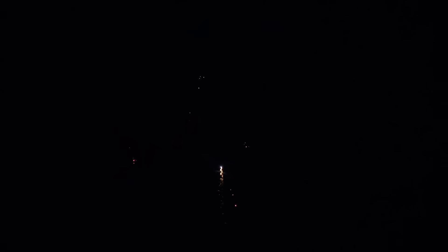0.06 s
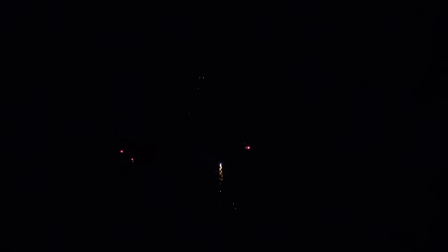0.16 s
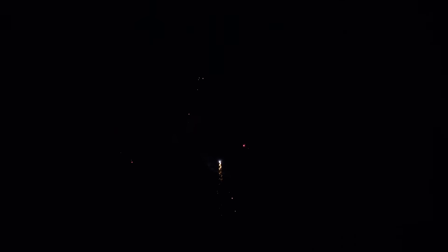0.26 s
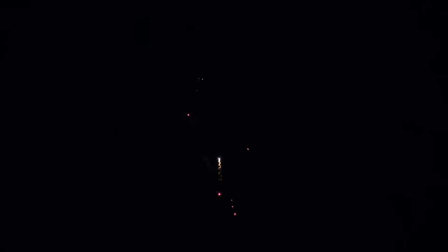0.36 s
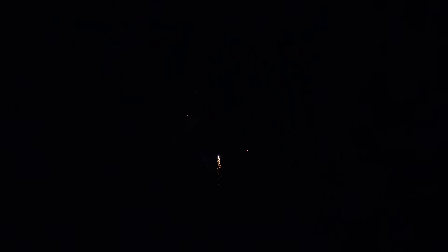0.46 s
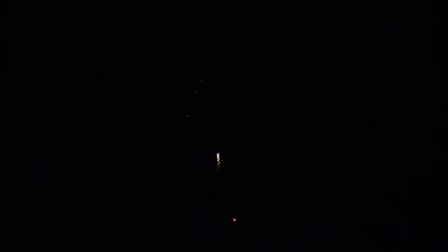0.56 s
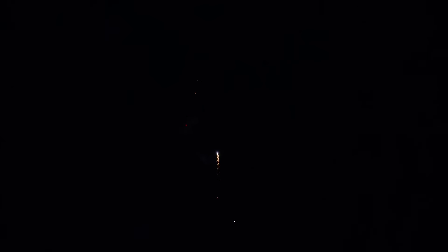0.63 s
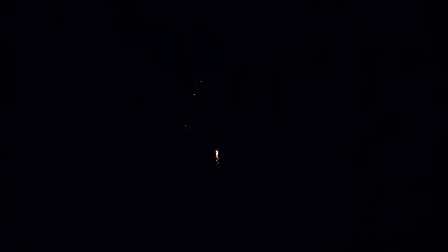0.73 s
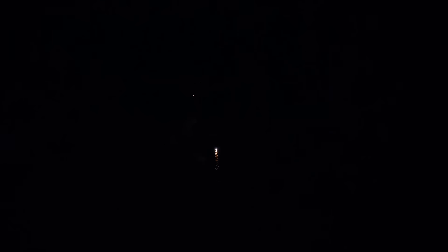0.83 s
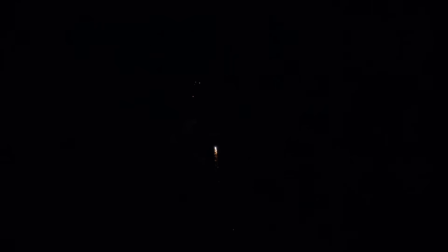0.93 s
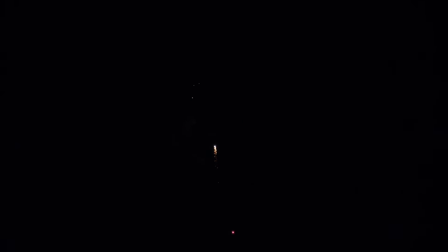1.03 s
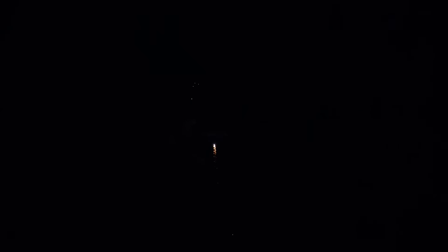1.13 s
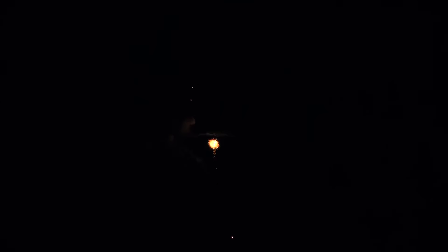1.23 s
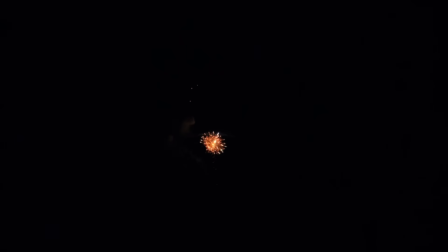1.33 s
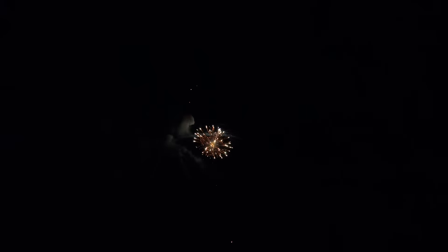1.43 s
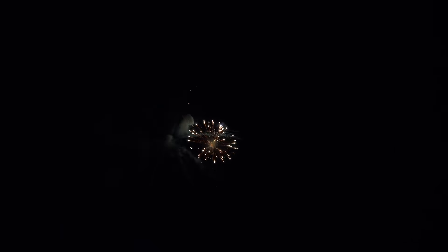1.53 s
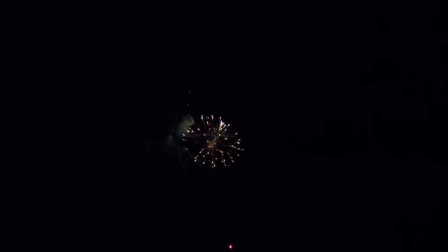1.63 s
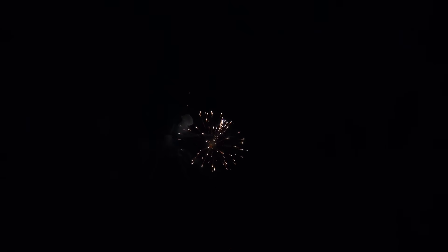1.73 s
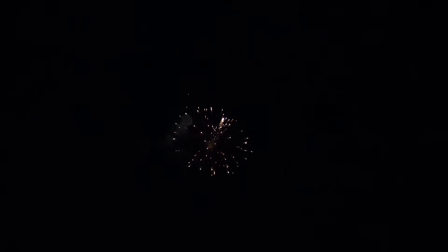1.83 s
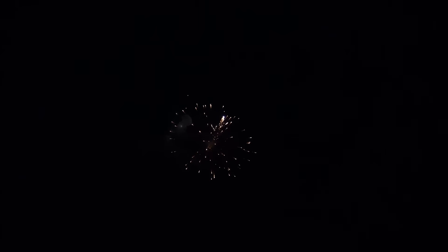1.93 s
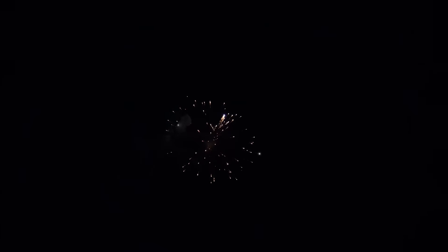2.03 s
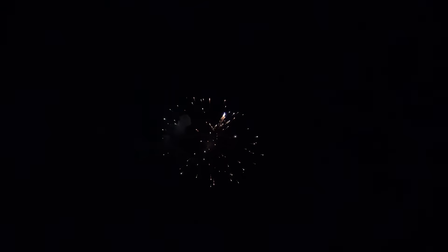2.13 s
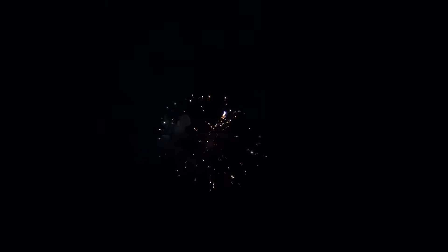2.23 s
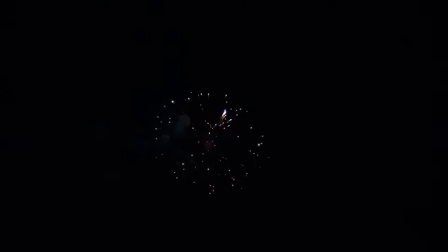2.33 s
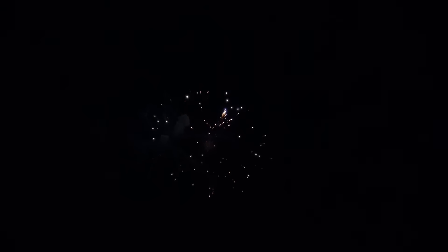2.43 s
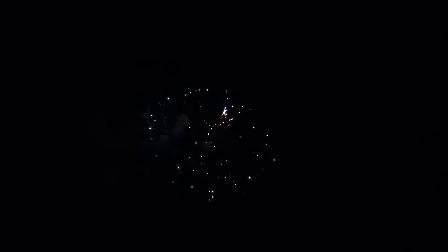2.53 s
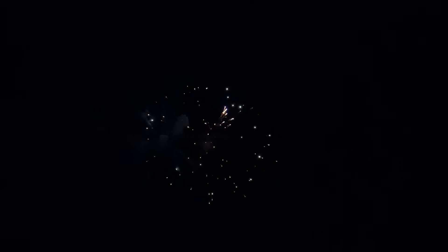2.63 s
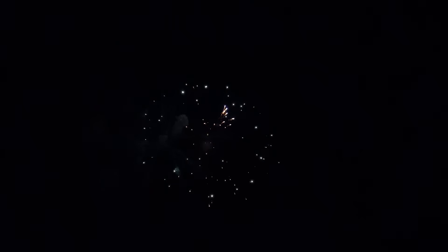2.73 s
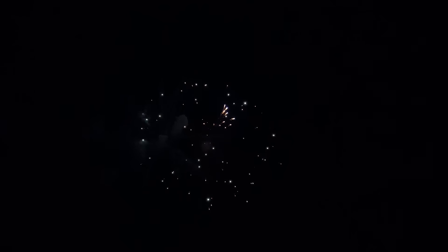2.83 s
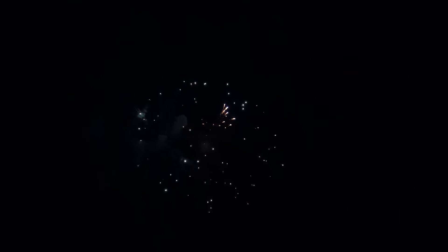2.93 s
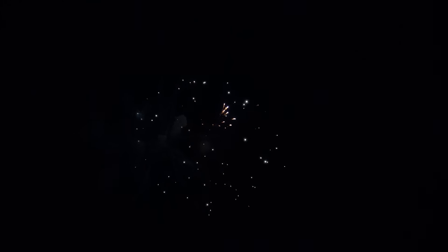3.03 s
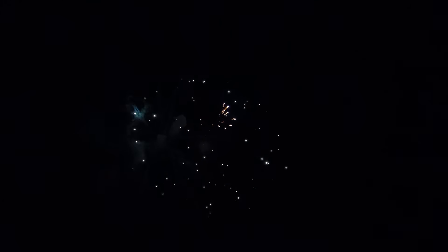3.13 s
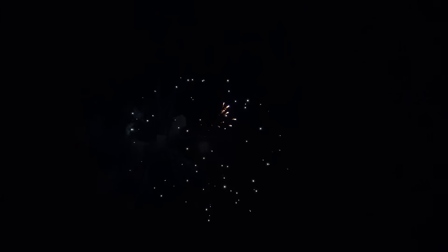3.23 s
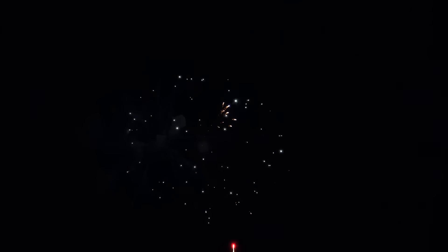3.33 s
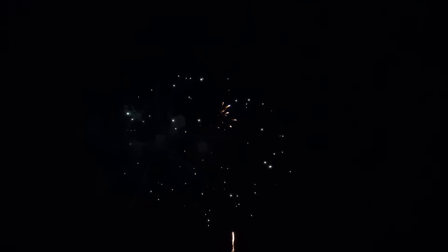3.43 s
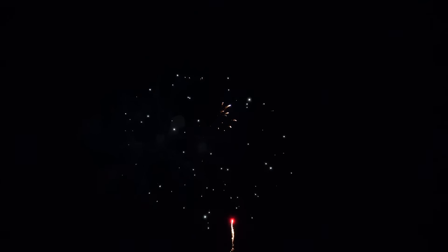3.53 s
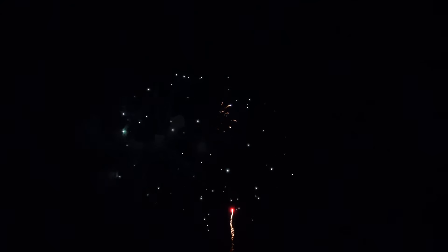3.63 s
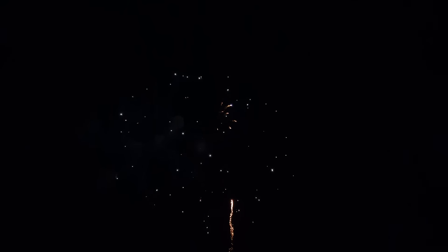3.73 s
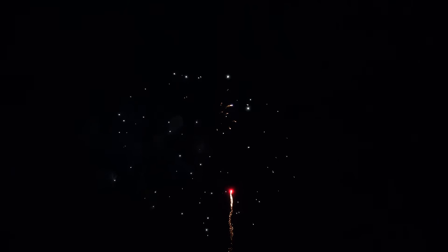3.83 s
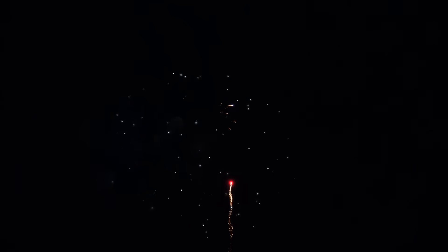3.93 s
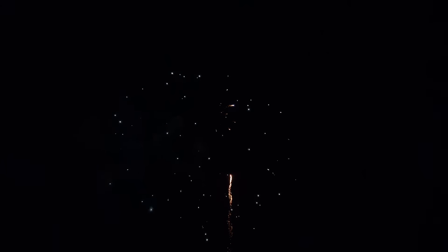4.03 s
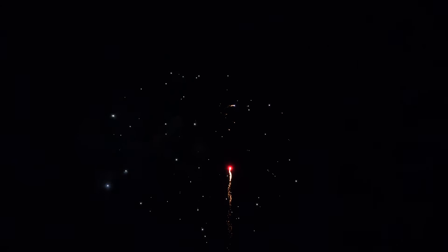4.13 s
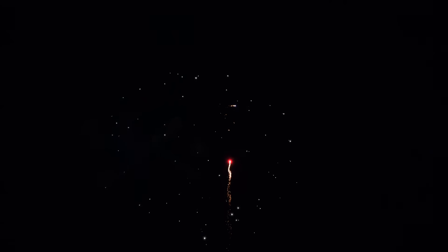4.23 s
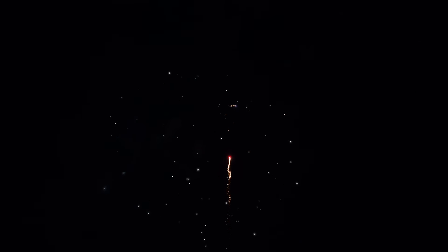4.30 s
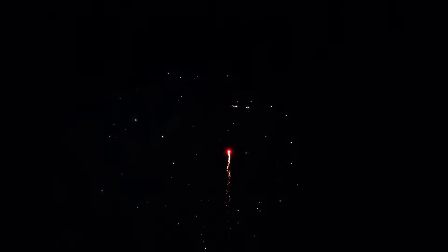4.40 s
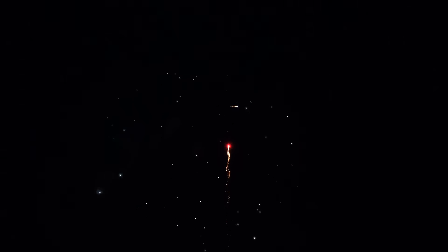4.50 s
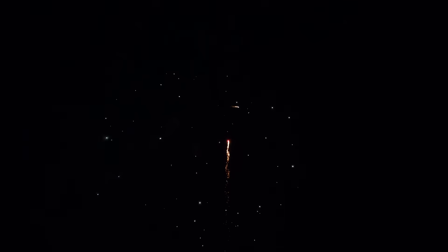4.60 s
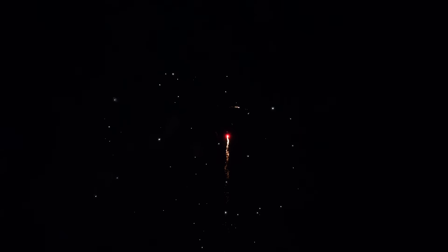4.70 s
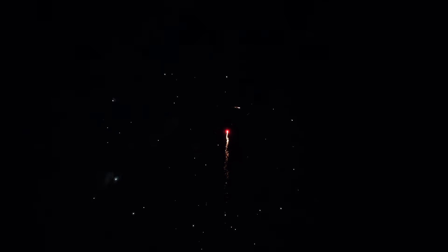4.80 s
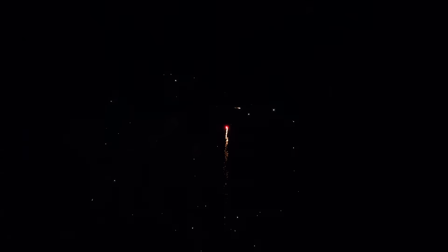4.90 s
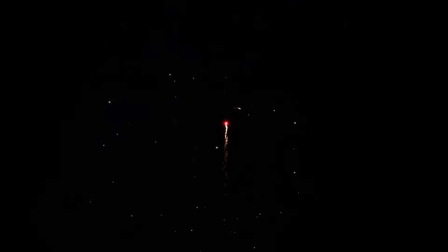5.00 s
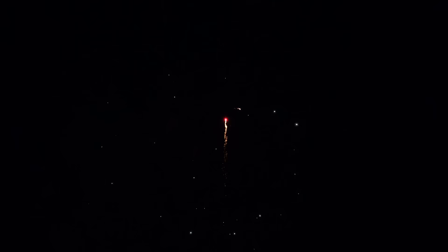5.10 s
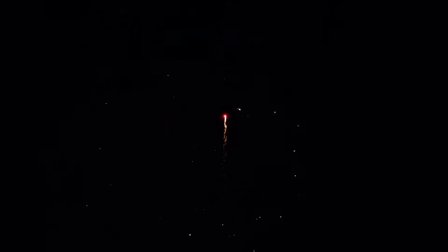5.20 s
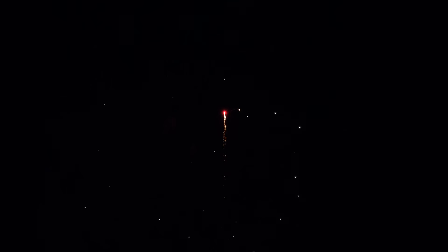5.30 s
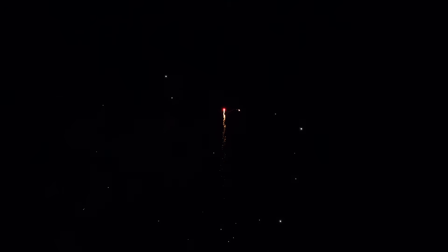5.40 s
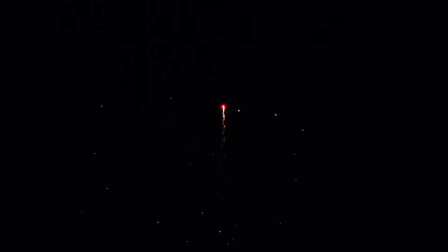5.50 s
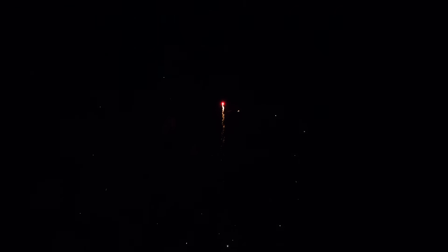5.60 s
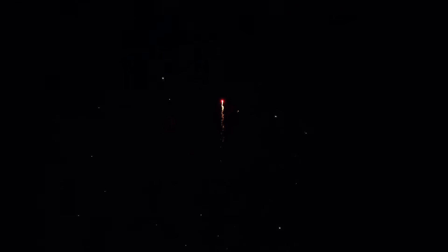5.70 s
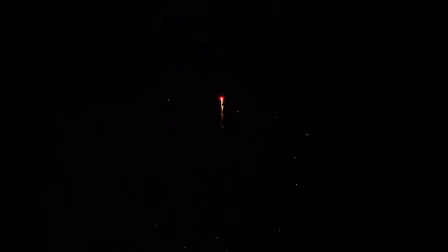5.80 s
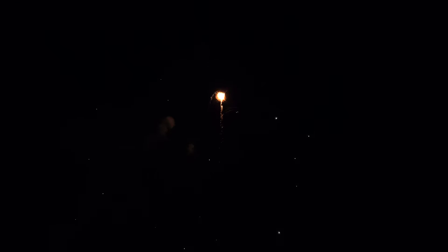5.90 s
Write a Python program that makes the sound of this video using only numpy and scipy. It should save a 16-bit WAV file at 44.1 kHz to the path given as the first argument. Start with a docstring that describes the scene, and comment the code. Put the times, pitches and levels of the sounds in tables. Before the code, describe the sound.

Faint dry ticks and a fading earlier rumble open a quiet open-air night. Far pops on a dull swell lead into a rounded firework thump, followed quickly by a brighter, ragged crack with a short bass boom. Ground and walls throw back clattering knocks, thinning into a long dull roll. Late distant reports and more ticks remain. The stereo pickup is bass-heavy towards the left, and the peaks saturate.

```python
"""Open country at night: low rumble, steady hiss, an earlier shell still rolling, and faint ticks close by.
Far reports then rumble on a dull swell, with thin falling peeps, until a firework shell gives a round thump.
A second shell follows with a tearing rasp, a harder crack and a deep boom; ground and walls return each shock.
The echoes roll away and grow dull; late far reports and more ticks remain.
Bangs are filtered N-waves, booms decaying sines, echoes shaped noise dulled by air, ticks short noise bursts."""
import sys
import numpy as np
from scipy import signal
from scipy.fft import rfft, irfft, next_fast_len
from scipy.io import wavfile
from scipy.ndimage import map_coordinates

SR = 44100
rng = np.random.default_rng(int(sys.argv[2]) if len(sys.argv) > 2 else 0)


def transcribe(u):
    """Save the signal u as a 16-bit wav file named by the first command-line argument.

    u: samples, shape (n,) or (channels, n), limited to [-1, 1]; the rate is SR.
    q: integer samples, one column per channel.
    """
    v = np.clip(np.atleast_2d(u).T, -1, 1)
    q = np.round(v * 32767).astype(np.int16)
    wavfile.write(sys.argv[1], SR, q)


N = 262395

# direct shock waves, thump then crack: (time [s], level [dB], length [ms], low-pass edge [Hz], left-right [dB])
SHELLS = [(1.935, 5.5, 2.48, 4750, -1.4), (2.5458, 2.5, 1.8, 13000, -1)]
# strongest returns from ground and walls: (time [s], level [dB], length [ms], left-right [dB])
REFLECTIONS = [(1.946, -10.5, 2.4, 2), (1.957, -18, .7, -2), (1.9747, -14, 2.7, 3.5),
               (2.0432, -9, 2.9, 1.5), (2.145, -19.5, 0.72, -3), (2.1722, -24.5, 0.56, -9),
               (2.183, -21, 1.2, -6), (2.548, -4, 1.63, -3), (2.5545, -4.5, 0.87, 2.5),
               (2.5788, -15, 3.6, -6), (2.5903, -8.5, 0.63, -1), (2.6239, -11.5, .8, -2),
               (2.6825, -10.5, 0.64, -2), (2.7176, -19, .8, -15), (2.739, -14, 0.6, 0.5),
               (2.887, -21, 1.3, -10), (2.9279, -26, 1.2, -10), (2.996, -17, 1.15, 9),
               (3.075, -18.5, 1.1, 12.5), (3.1044, -15, 1.36, 7), (3.153, -20, 0.51, 5),
               (3.1871, -17, 0.82, 10), (3.589, -31.5, 0.36, 0.5), (3.707, -25.5, 1.15, 7.5),
               (3.8762, -34, 1.5, -3)]
# spectrum of wall clatter and far pops: (frequency [Hz], relative density [dB])
SLAP_COLOUR = [(100, -16.5), (400, -1.5), (800, 2.5), (1600, -5.5), (2600, -15), (5000, -20), (8000, -34.5),
               (15000, -55)]
# spectrum of the rasp and the snaps: (frequency [Hz], relative density [dB])
TEAR_COLOUR = [(40, -13), (250, -12), (450, -3), (1300, 0), (2400, -9.5), (3800, -8), (5900, -10.5),
               (7500, -28.5), (10500, -29.5), (15000, -32)]
SPREAD_S = 0.042  # echo age at which spreading loss sets in


def amp(db):
    """Decibels to gain."""
    return 10 ** (np.asarray(db) / 20)


def unit(x):
    """x at rms 1."""
    return x / np.sqrt(np.mean(x ** 2) + 1e-20)


def along(points, hz):
    """(Hz, value) points interpolated on a log-frequency axis."""
    point_hz, values = np.transpose(points)
    return np.interp(np.log(hz + 1), np.log(point_hz), values)


def since(start_s):
    """Seconds after a moment, zero before it."""
    return np.maximum(np.arange(N) / SR - start_s, 0)


def level(rows):
    """Gain per sample from (s, dB) rows."""
    return amp(np.interp(since(0), *np.transpose(rows)))


def panned(pan_db):
    """Left and right gains, pan_db apart."""
    return amp([[pan_db / 2], [-pan_db / 2]])


def wobble(knots_per_s):
    """Smooth random curve through normally distributed knots."""
    knots = rng.standard_normal(int(N * knots_per_s / SR) + 4)
    return map_coordinates(knots, [np.arange(N) * knots_per_s / SR])


def filtered(x, response):
    """x with its spectrum multiplied by a response of frequency."""
    size = next_fast_len(N + SR // 2)
    hz = np.fft.rfftfreq(size, 1 / SR)
    return irfft(rfft(x, size) * response(hz), size)[..., :N]


def butter(x, hz, kind, order):
    """Causal Butterworth low-pass or high-pass."""
    sos = signal.butter(order, min(hz, SR / 2 - 100), kind, fs=SR, output="sos")
    return signal.sosfilt(sos, x)


def scatter(colour, spiky_db):
    """Stereo wash of rms 1: countless reflections of uneven size, narrow in the bass."""
    # side relative to mid: (frequency [Hz], level [dB])
    side_width = [(60, -18.5), (250, -8.5), (500, -8), (1000, -5.5), (4000, 0.5), (12000, -5)]
    size_db = spiky_db * np.repeat(rng.standard_normal(N // 32 + 1), 32)[:N]
    pair = amp(size_db) * rng.standard_normal((2, N))

    def mid_side_gains(hz):
        return amp(along(colour, hz)) * np.array([np.ones_like(hz), amp(along(side_width, hz))])

    mid, side = filtered(pair, mid_side_gains)
    return unit(np.array([mid + side, mid - side]))


def swells(rows, t60_s):
    """Joint envelope of (s, dB, rise s) events with a common decay; their powers add."""
    power, t = np.zeros(N + SR), np.arange(SR) / SR
    for start_s, db, rise_s in rows:
        envelope = amp(db - 60 * t / t60_s) * (1 - np.exp(-t / rise_s))
        power[max(round(start_s * SR), 0):][:SR] += envelope ** 2
    return np.sqrt(power[:N])


def through_air(x, travel_s, air_db_per_s_khz):
    """Air absorption grows with frequency and travel time, so longer paths are duller."""
    hz, t, z = signal.stft(x, SR, nperseg=512)
    loss_db = air_db_per_s_khz * np.outer(hz / 1000, np.interp(t, since(0), travel_s))
    return signal.istft(z * amp(-loss_db), SR, nperseg=512)[1][:, :N]


def shocks(rows, rough_db, rear_share, low_cut_hz=110, rough_ms=4.1, rough_width=.45):
    """N-waves: pressure jumps, falls through zero into suction, and closes with a softer rear edge."""
    out, ms = np.zeros((2, N)), np.arange(SR // 20) * 1000 / SR
    for start_s, db, length_ms, edge_hz, pan_db in rows:
        rear = (1 - np.tanh((ms - length_ms) / (rear_share * length_ms))) / 2
        wave = (1 - 2 * ms / length_ms) * rear
        wave = butter(wave, edge_hz, "low", order=3)  # long paths round the front
        # rough ground splinters the treble
        mid, side = rng.standard_normal((2, len(ms))) * np.exp(-ms / rough_ms)
        splash = (mid + rough_width * np.array([side, -side])) / np.linalg.norm(mid)
        splash = butter(splash, 1200, "high", order=2)
        rough = signal.fftconvolve(wave[None], splash, axes=1)[:, :len(ms)]
        pair = amp(db) * panned(pan_db) * (wave + amp(rough_db) * rough)
        lead = round(pan_db)  # the louder port hears the front first, a sample per dB
        out[0, round(start_s * SR) - lead:][:len(ms)] += pair[0]
        out[1, round(start_s * SR):][:len(ms)] += pair[1]
    return butter(out, low_cut_hz, "high", order=2)


def night():
    """Low outdoor rumble, steady hiss, and a very faint, slightly wavering high tone."""
    # rumble level: (time [s], level [dB])
    rumble_level = [(0, -54), (1.4, -56.5), (3.5, -48), (5.0, -56), (5.3, -52.5), (5.65, -55.5),
                    (5.95, -52)]
    # spectra: (frequency [Hz], relative density [dB])
    rumble_colour = [(20, -26), (50, -10), (90, -13), (135, -1), (190, -0.5), (260, -6.5), (380, -7),
                     (500, -15), (800, -15.5), (1400, -27), (2500, -42), (6000, -55)]
    hiss_colour = [(100, 4), (3000, 3), (5000, 2), (9000, 0), (15500, 0)]
    rumble = level(rumble_level) * amp(0.92 * wobble(17)) * scatter(rumble_colour, spiky_db=-1.5)
    hiss = amp(-83.5) * scatter(hiss_colour, spiky_db=0)
    high_tone = amp(-100) * np.sin(2 * np.pi * 13980 * since(0) + wobble(120))
    return rumble + hiss + high_tone


def wash(colour, age_s, air_db_per_s_khz, spiky_db, flutter_db):
    """Countless echoes that dull with age; houses and tree lines answer in clumps."""
    dulled = through_air(scatter(colour, spiky_db), age_s, air_db_per_s_khz)
    return dulled * amp(flutter_db * wobble(55))


def roll(age_s, spread_db_per_decade=21, slope_delay_s=.62, slope_peak_db=5.5, slope_octaves=0.47):
    """Gain of the land's answer to a shell: spreading loss, and one broad swell from the far slope."""
    spread_db = spread_db_per_decade * np.log10(1 + age_s / SPREAD_S)
    octaves = np.log2(age_s / slope_delay_s + 1e-9)  # of age, from the swell's peak
    slope_db = slope_peak_db * np.exp(-.5 * (octaves / slope_octaves) ** 2)
    return amp(slope_db - spread_db) * (age_s > 0)


def echoes(old_age_s=1, old_db=-48, old_fade_db_per_s=5,
           thump_db=-18.0, thump_pan_db=-0.5, thump_fade_db_per_s=3,
           crack_db=-14.5, crack_fade_db_per_s=0.46):
    """Three shells' echoes overlap: an earlier one still rolling, the thump and the crack."""
    # spectra: (frequency [Hz], relative density [dB])
    old_colour = [(25, -29), (55, -16), (100, -12.5), (135, 2), (185, -2), (260, -8), (420, -9),
                  (600, -13.5), (1000, -19), (2000, -31.5), (4000, -41.5), (10000, -59.5)]
    thump_colour = [(25, -29), (55, -14), (105, -1.5), (200, 0), (315, 0.5), (410, -2), (550, -8.5),
                    (800, -8.5), (1300, -15.5), (2000, -24), (4000, -34.5), (6800, -45), (10000, -64.5),
                    (15000, -77.5)]
    crack_colour = [(25, -25.5), (50, -10), (100, -2), (225, -4.5), (320, 0), (560, -2), (800, -6),
                    (1300, -9.5), (2000, -16.5), (4000, -27), (6500, -34), (9000, -51), (15000, -71.5)]
    thump_age, crack_age = (since(start_s) for start_s, *_ in SHELLS)
    old = wash(old_colour, since(0) + old_age_s, air_db_per_s_khz=3.5, spiky_db=-0.5, flutter_db=2.0)
    old = amp(old_db - old_fade_db_per_s * since(0)) * old
    thump = wash(thump_colour, thump_age, air_db_per_s_khz=1.23, spiky_db=1.5, flutter_db=1.06)
    thump = roll(thump_age) * amp(thump_db - thump_fade_db_per_s * thump_age) * thump
    crack = wash(crack_colour, crack_age, air_db_per_s_khz=3.0, spiky_db=1.16, flutter_db=1.2)
    crack = roll(crack_age) * amp(crack_db - crack_fade_db_per_s * crack_age) * crack
    return old + thump * panned(thump_pan_db) + crack


def ticks(rise_s=0.00047, t60_s=0.037, trail_db=-10, rustle_rise_s=0.01, rustle_t60_s=0.24):
    """Tiny dry ticks close by, each trailing a short rustle; a few rustles come alone."""
    # ticks, then lone rustles: (time [s], level [dB])
    tick_rows = [(0.034, -56), (0.268, -56), (0.298, -60.5), (5.351, -56.5), (5.398, -58.5), (5.496, -57),
                 (5.528, -59.5)]
    rustle_rows = [(.892, -74), (2.455, -58), (4.66, -67)]
    # spectrum: (frequency [Hz], relative density [dB])
    tick_colour = [(500, -1.5), (1900, 2), (3500, 1), (4700, -9), (6500, -5.5), (10000, -17.5),
                   (15000, -21.5)]
    snaps = swells([(s, db, rise_s) for s, db in tick_rows], t60_s)
    trails = [(s, db + trail_db) for s, db in tick_rows]
    rustles = swells([(s, db, rustle_rise_s) for s, db in [*trails, *rustle_rows]], rustle_t60_s)
    return np.hypot(snaps, rustles) * scatter(tick_colour, spiky_db=2)


def far_reports(body_t60_s=.6, pop_db=-10, pop_t60_s=.09,
                front_db=12, sharp_rise_s=0.0028, length_ms=1.4, edge_hz=1500):
    """Distant reports: a short pop on a dull swell; the quicker the rise, the more is left of the front."""
    # reports blurred by distance: (time [s], level [dB], rise [s])
    reports = [(1.379, -53.5, 0.0033), (1.472, -39.5, 0.039), (1.525, -47, 0.0025), (1.585, -46.5, 0.0082),
               (1.658, -42, 0.0059), (1.741, -44, 0.023), (1.86, -39.5, 0.013), (4.724, -47.5, 0.0026),
               (5.875, -48, 0.02)]
    # spectrum: (frequency [Hz], relative density [dB])
    far_colour = [(25, -21), (90, -1), (200, 3.5), (300, -2), (410, 1.5), (540, -7.5), (850, -7.5),
                  (1500, -18), (2500, -34.5), (4000, -47), (9000, -83.5)]
    fronts = []
    for start_s, db, rise_s in reports:
        blur_db = 20 * np.log10(rise_s / sharp_rise_s)
        fronts.append((start_s, db + front_db - blur_db, length_ms, edge_hz, 0))
    pops = swells(reports, pop_t60_s) * scatter(SLAP_COLOUR, spiky_db=-0.5)
    pops = butter(pops, 2400, "low", order=2)
    body = swells(reports, body_t60_s) * scatter(far_colour, spiky_db=4)
    return shocks(fronts, rough_db=-19, rear_share=0.081) + amp(pop_db) * pops + body


def chirps(length_s=.085, sag_hz_per_s=1660, waver_rad=1.3):
    """Thin, faint, falling peeps, like those of a distant bird: sine glides with a wavering phase."""
    # peeps: (time [s], starting frequency [Hz], level [dB])
    peeps = [(1.496, 3140, -80), (1.75, 2990, -79), (4.57, 2950, -80)]
    out, drift_rad = np.zeros(N), waver_rad * wobble(90)
    for start_s, hz, db in peeps:
        t = np.minimum(since(start_s), length_s)
        envelope = np.sin(np.pi * t / length_s)
        out += amp(db) * envelope * np.sin(2 * np.pi * (hz - sag_hz_per_s * t / 2) * t + drift_rad)
    return out


def bangs():
    """Two shock waves straight from the sky; the thump is fuller, the crack more ragged."""
    thump, crack = SHELLS
    return (shocks([thump], rough_db=-15, rear_share=0.13, low_cut_hz=130, rough_ms=1.6, rough_width=0.51)
            + shocks([crack], rough_db=-11, rear_share=.14, low_cut_hz=150, rough_ms=0.27, rough_width=.3))


def reflections(thump_sharpness=2.2, crack_sharpness=4.2, blunt_s=.3):
    """Each returns the latest bang; its front is blunter the longer the wave and the farther it has come."""
    (thump_s, *_), (crack_s, *_) = SHELLS
    rows = []
    for start_s, db, length_ms, pan_db in REFLECTIONS:
        from_crack = start_s > crack_s - SPREAD_S
        fired_s, sharpness = (crack_s, crack_sharpness) if from_crack else (thump_s, thump_sharpness)
        wave_hz = 1000 / length_ms
        edge_hz = wave_hz * sharpness / (1 + (start_s - fired_s) / blunt_s)  # halved after blunt_s
        rows.append((start_s, db, length_ms, edge_hz, pan_db))
    return shocks(rows, rough_db=-9.5, rear_share=0.062)


def slaps(clatter_db=-16.5, rise_s=.0015, t60_s=0.065,
          snap_db=-19, snap_rise_s=0.0004, snap_t60_s=0.022, db_per_octave=6):
    """Broken walls add bright clatter to each reflection, most to short waves; those of the crack also snap."""
    (thump_s, *_), (crack_s, *_) = SHELLS
    travel_s = np.where(since(crack_s) > 0, since(crack_s), since(thump_s))
    sizes = [(s, db - db_per_octave * np.log2(length_ms)) for s, db, length_ms, _ in REFLECTIONS]
    clatter = swells([(s, db + clatter_db, rise_s) for s, db in sizes], t60_s)
    clatter = clatter * scatter(SLAP_COLOUR, spiky_db=3.0)
    snaps = swells([(s, db + snap_db, snap_rise_s) for s, db in sizes if s > crack_s], snap_t60_s)
    snaps = snaps * scatter(TEAR_COLOUR, spiky_db=2.5)
    return (through_air(clatter, travel_s, air_db_per_s_khz=5.0)
            + through_air(snaps, travel_s, air_db_per_s_khz=10.5))


def tear(db=-15, t60_s=.03, pan_db=7.0, lead_s=.011):
    """A bright tearing rasp swells into the front of the second bang, then dies."""
    front_s = SHELLS[1][0]
    swell = np.clip(since(front_s - lead_s) / lead_s, 0, 1) ** 1.3
    envelope = amp(db - 60 * since(front_s) / t60_s) * swell
    return envelope * scatter(TEAR_COLOUR, spiky_db=2.5) * panned(pan_db)


def booms(t60_s=0.1, low_cut_hz=38):
    """The ball of gas overshoots into suction and swings back for a few slow cycles."""
    # pressure swings of the second shell and their echoes: (time [s], level [dB], frequency [Hz])
    boom_rows = [(2.543, -10, 62.3), (2.576, -11.5, 98), (2.608, -20, 98.7), (2.852, -27.5, 81.8),
                 (2.991, -27, 85), (3.075, -24, 84), (3.158, -28.5, 84.3)]
    swings = np.zeros(N)
    for start_s, db, hz in boom_rows:
        t = since(start_s)
        swings -= amp(db - 60 * t / t60_s) * np.sin(2 * np.pi * hz * t)
    return butter(swings, low_cut_hz, "high", order=4)


def knocks(count=22, within_s=1.4, db=-6, spread_db=3.0, length_ms=0.93, edge_hz=1900, pan_spread_db=5):
    """Many smaller walls send the crack back as stray knocks, rounder the later they come."""
    crack_s = SHELLS[1][0]
    ages_s = within_s * (np.arange(count) + rng.random(count)) / count + SPREAD_S
    rows = []
    for age_s, (size, stretch, side) in zip(ages_s, rng.standard_normal((count, 3))):
        knock_db = db + 20 * np.log10(roll(age_s)) + spread_db * size
        knock_ms = length_ms * 2 ** (stretch / 2)
        rows.append((crack_s + age_s, knock_db, knock_ms, edge_hz / (1 + age_s), pan_spread_db * side))
    return shocks(rows, rough_db=-11, rear_share=0.29)


def scene():
    """Bangs, their echoes and the night around them."""
    surroundings = night() + echoes() + ticks() + far_reports() + chirps()
    return surroundings + bangs() + reflections() + slaps() + tear() + booms() + knocks()


def record(dry, top_hz=15800):
    """The left port hears more bass; loud bangs saturate at full scale; a steep low-pass limits the band."""
    # the two microphone ports: (frequency [Hz], left-right [dB])
    port_lean = [(50, 6), (90, 5), (170, 3), (400, 1.6), (8000, 0.7)]
    heard = filtered(dry, lambda hz: amp(np.outer([.5, -.5], along(port_lean, hz))))
    clipped = heard / (1 + np.abs(heard) ** 5) ** (1 / 5)
    return filtered(clipped, lambda hz: 1 / (1 + (hz / top_hz) ** 120))


dry = scene()
out = record(dry)
transcribe(out)
```